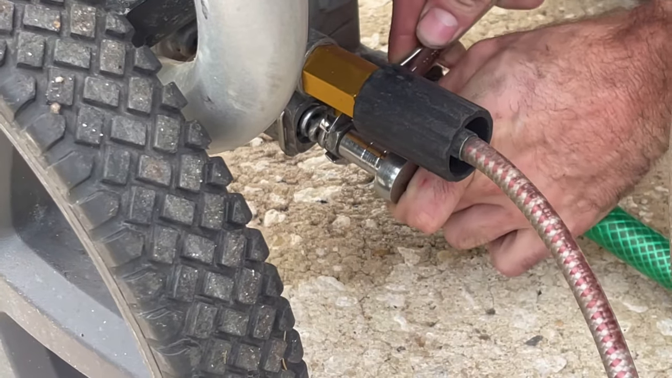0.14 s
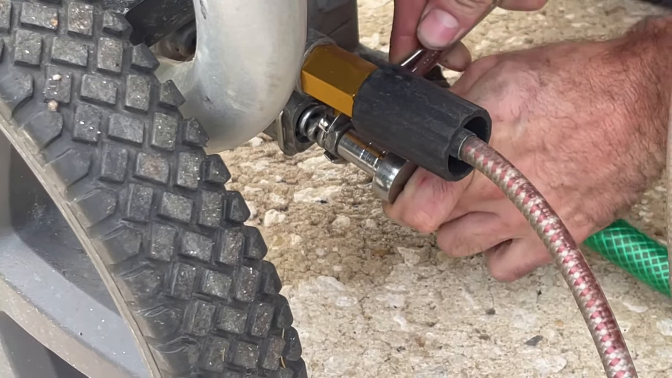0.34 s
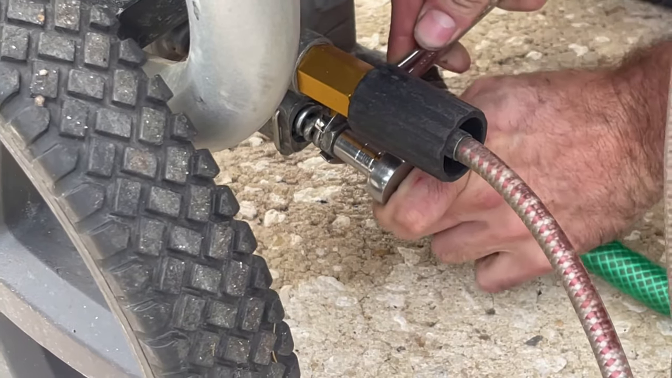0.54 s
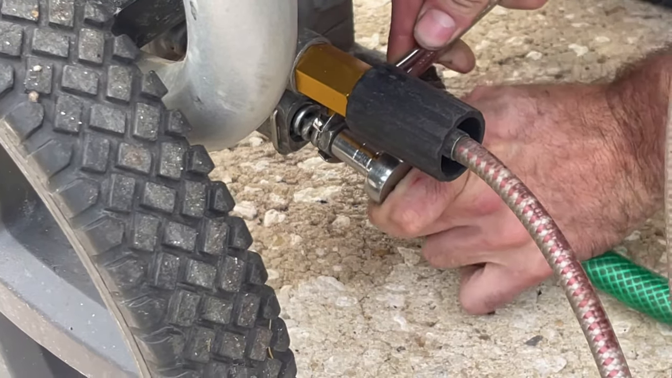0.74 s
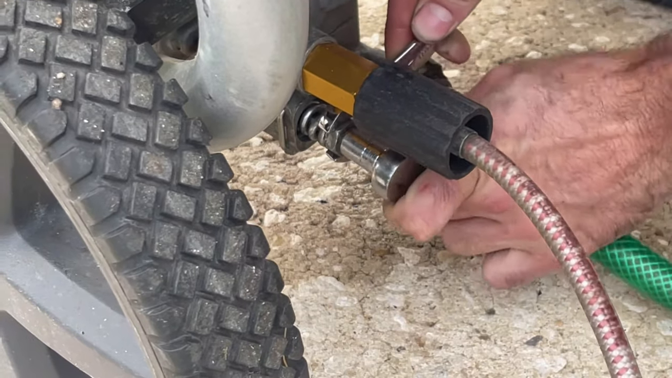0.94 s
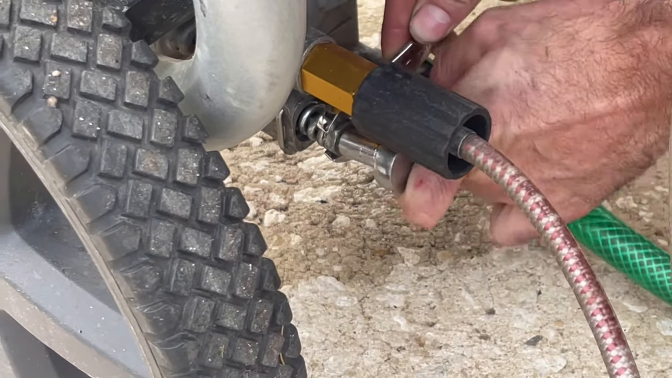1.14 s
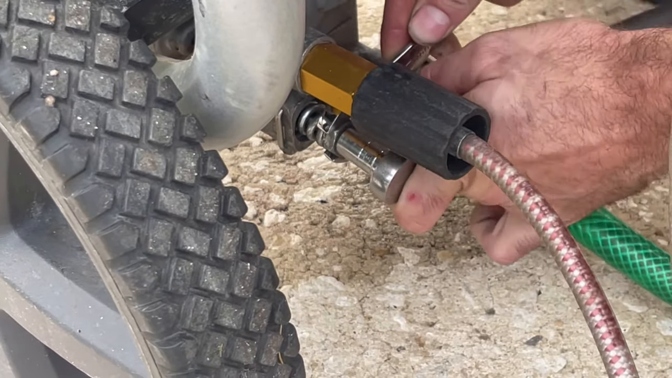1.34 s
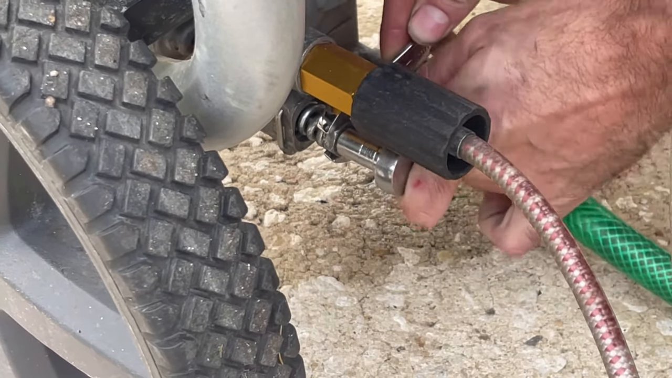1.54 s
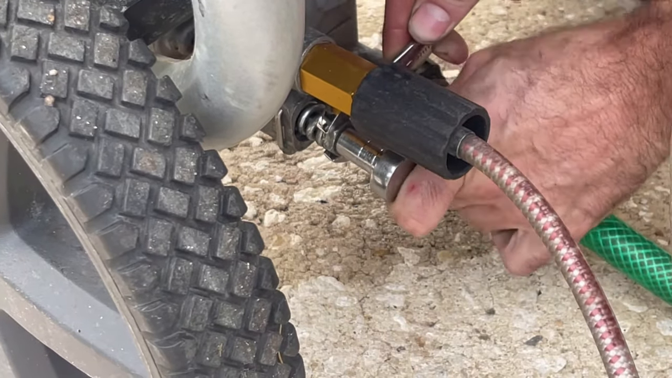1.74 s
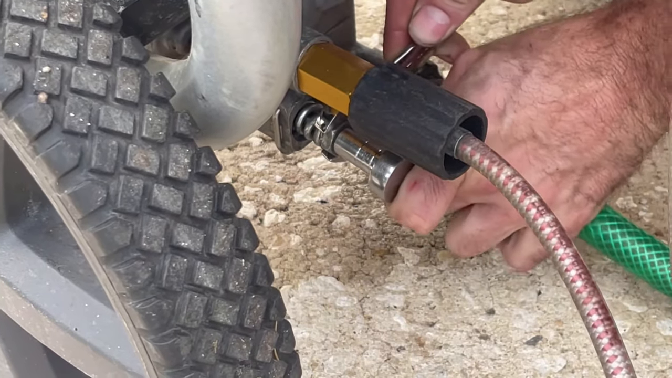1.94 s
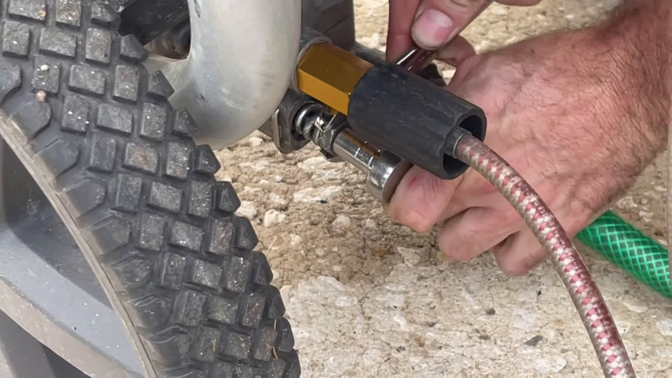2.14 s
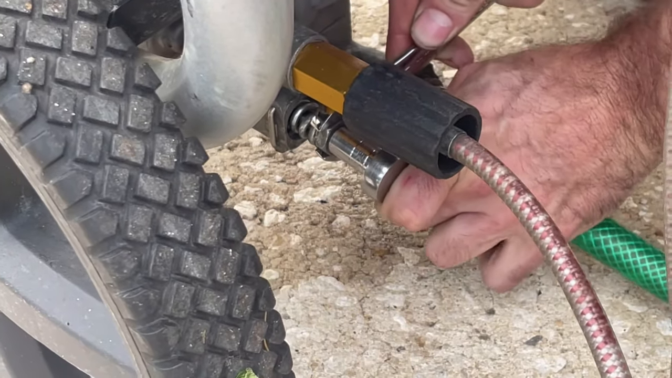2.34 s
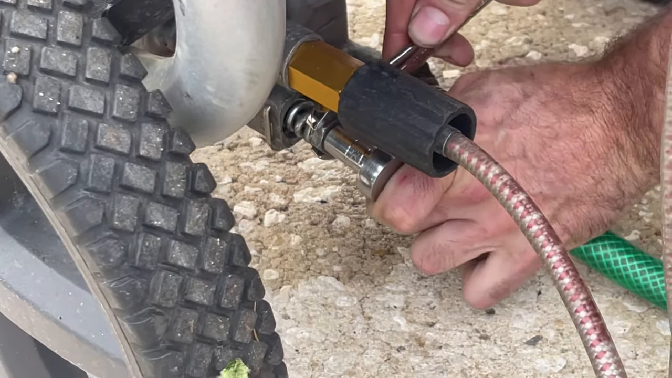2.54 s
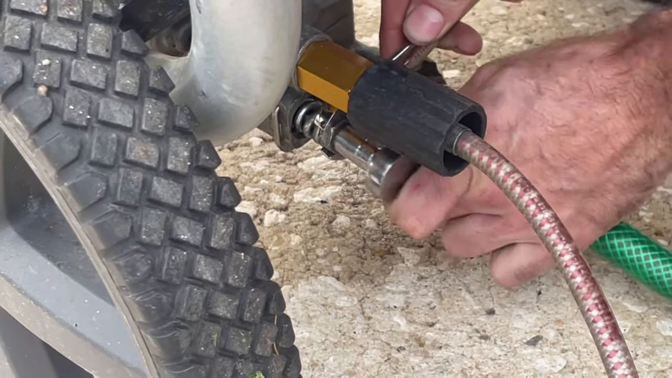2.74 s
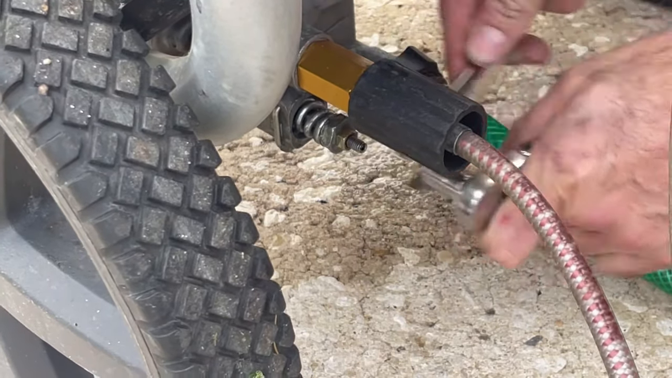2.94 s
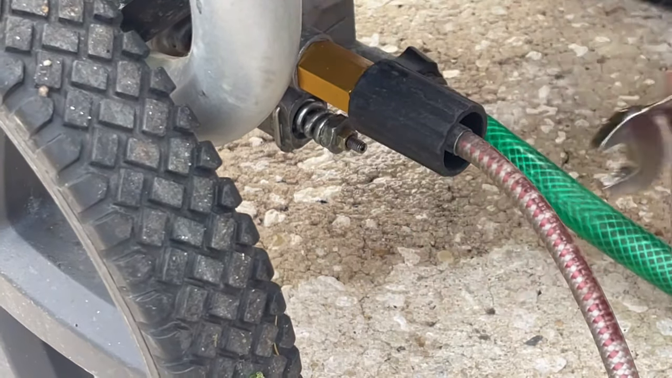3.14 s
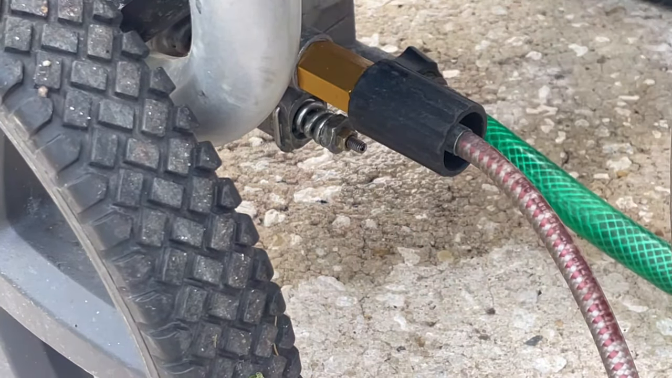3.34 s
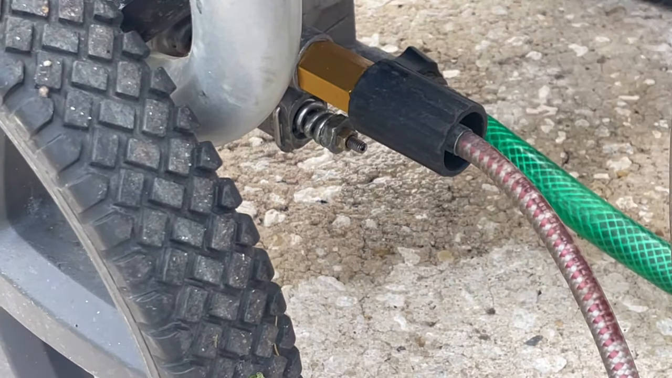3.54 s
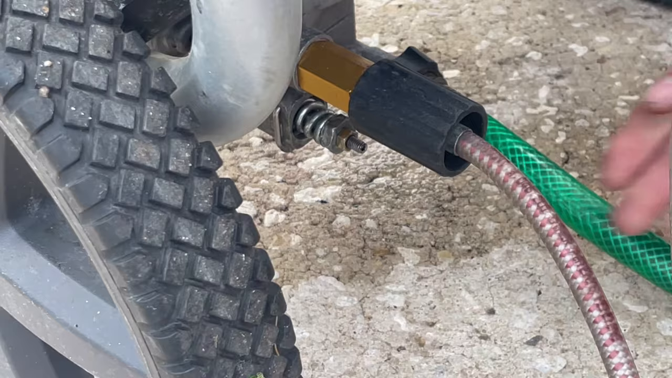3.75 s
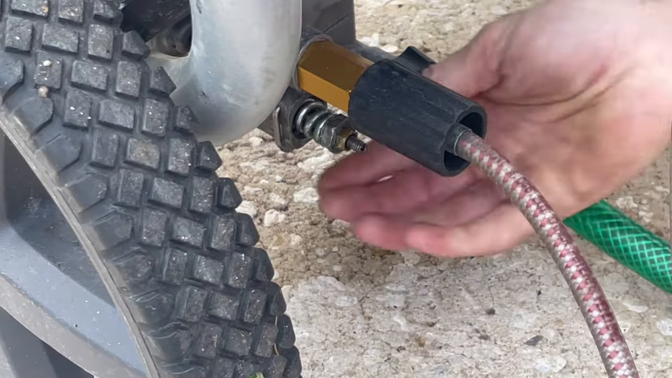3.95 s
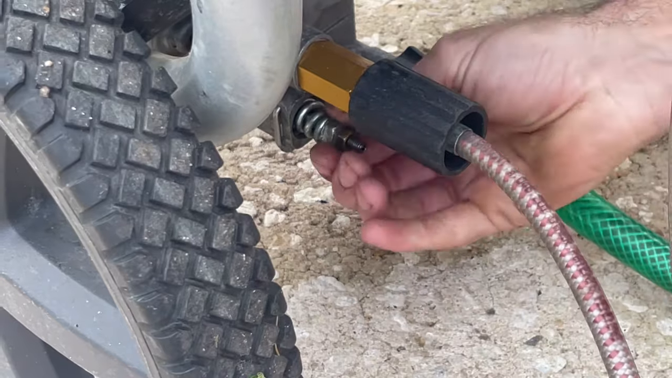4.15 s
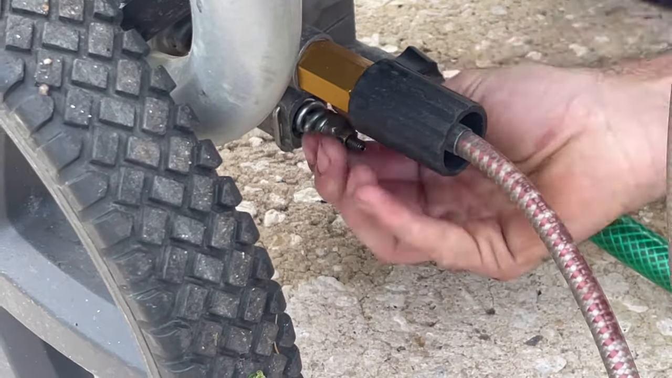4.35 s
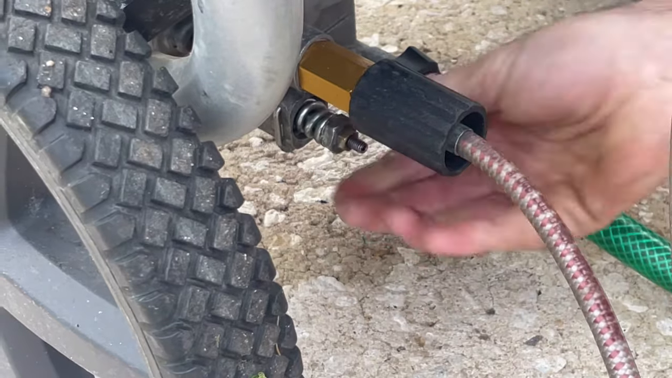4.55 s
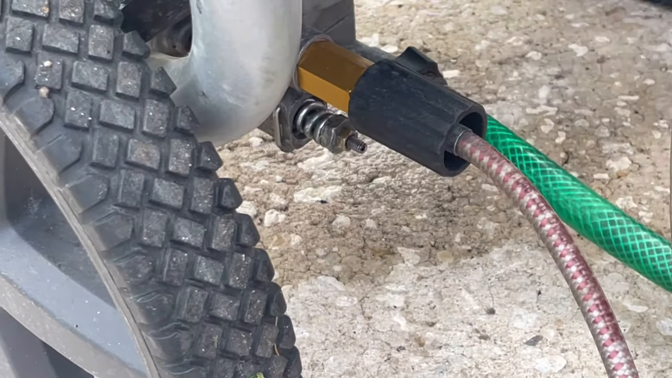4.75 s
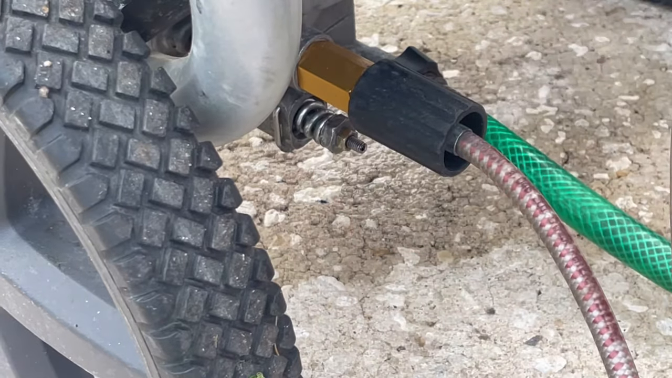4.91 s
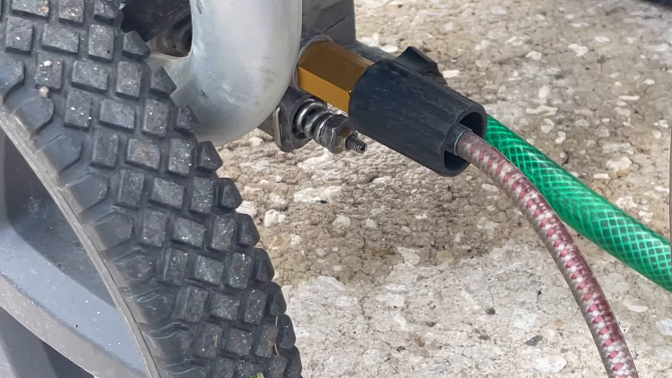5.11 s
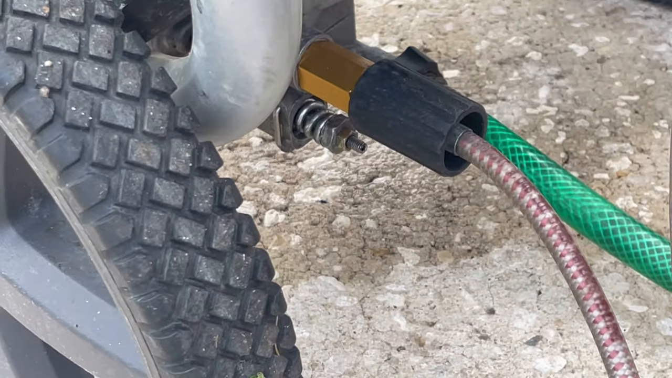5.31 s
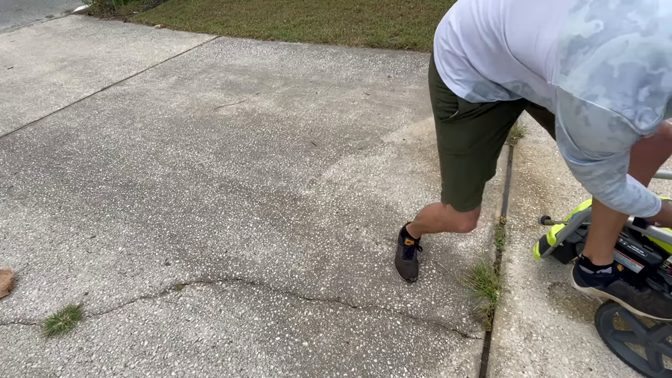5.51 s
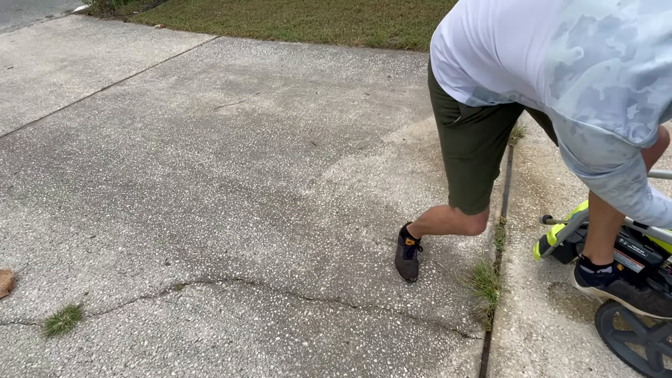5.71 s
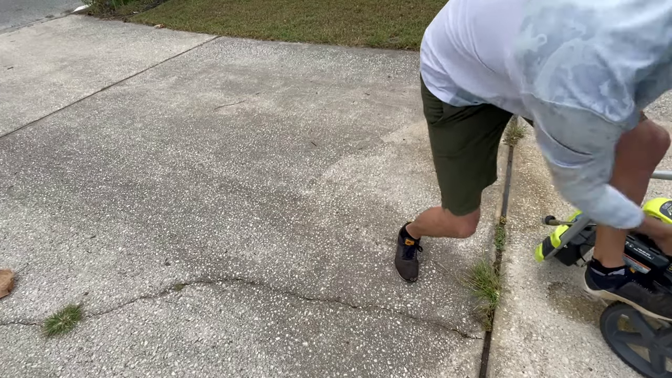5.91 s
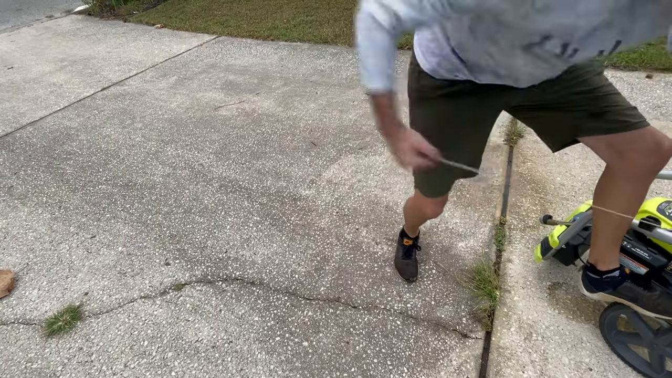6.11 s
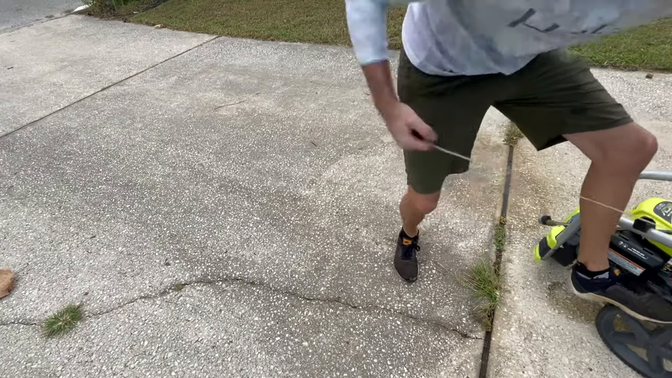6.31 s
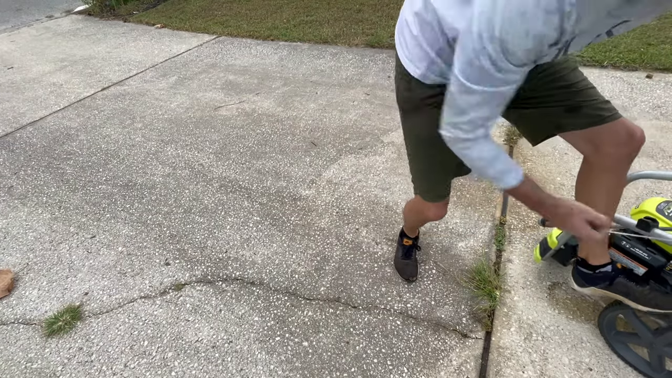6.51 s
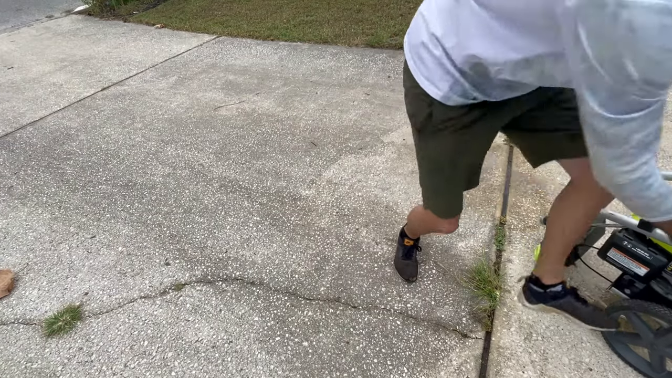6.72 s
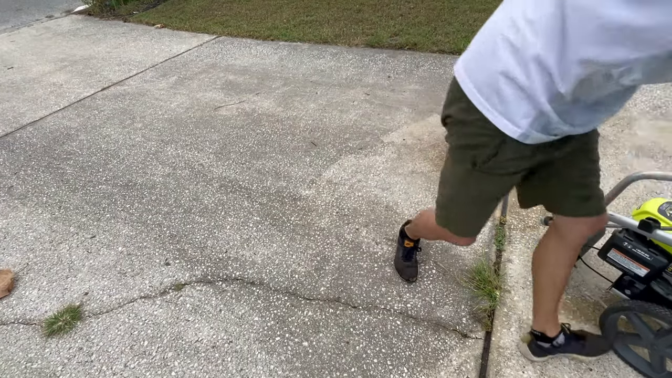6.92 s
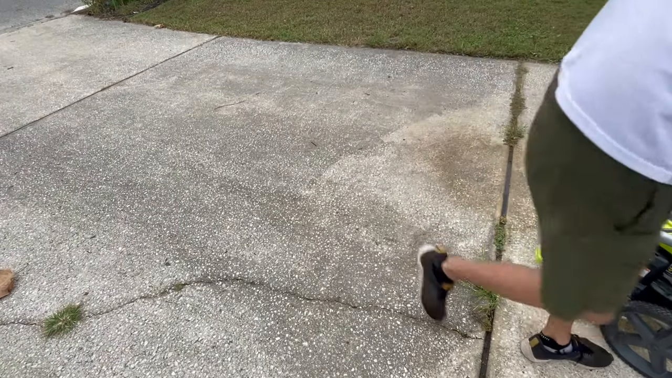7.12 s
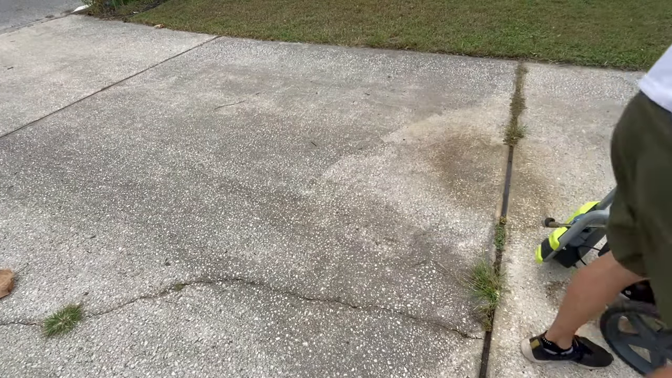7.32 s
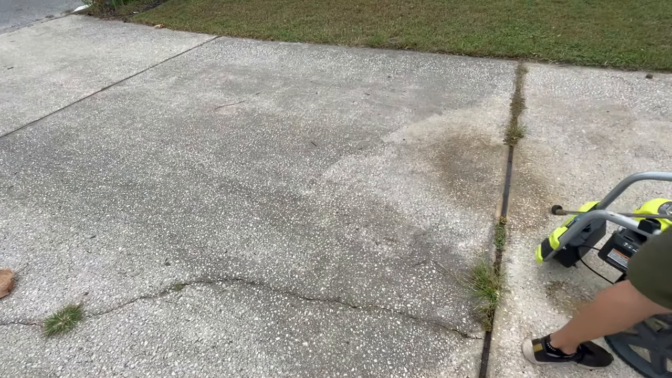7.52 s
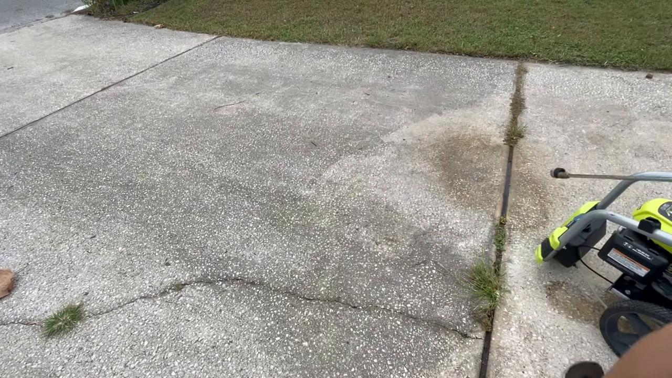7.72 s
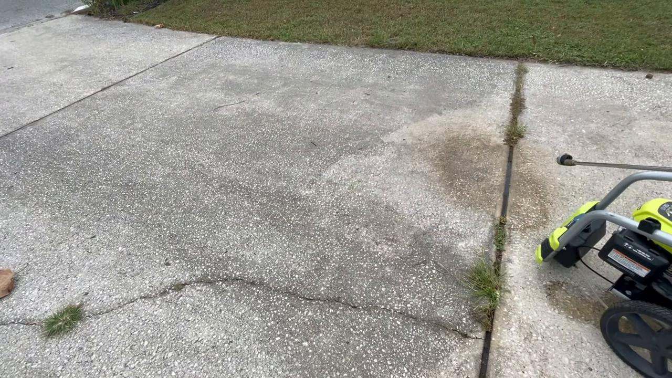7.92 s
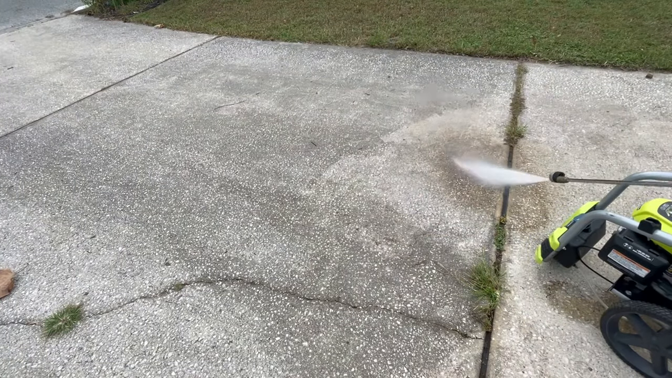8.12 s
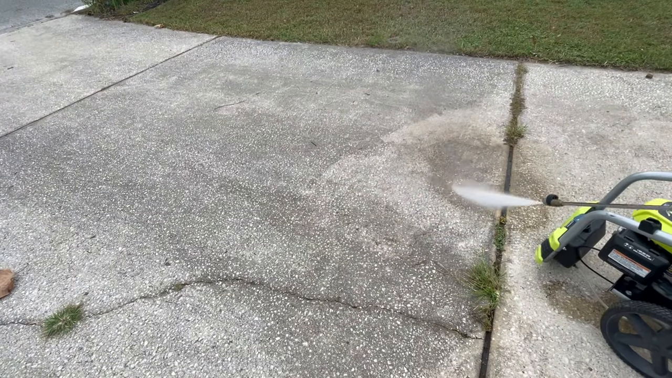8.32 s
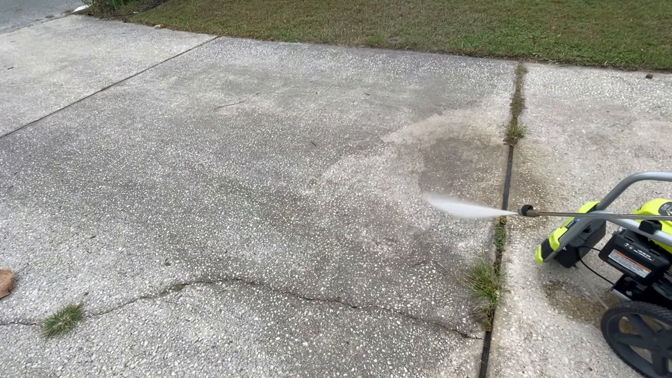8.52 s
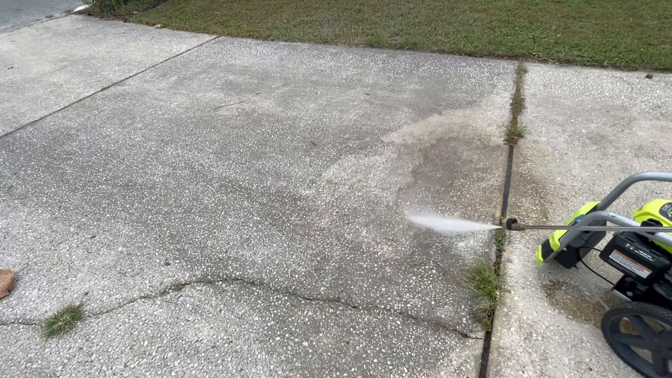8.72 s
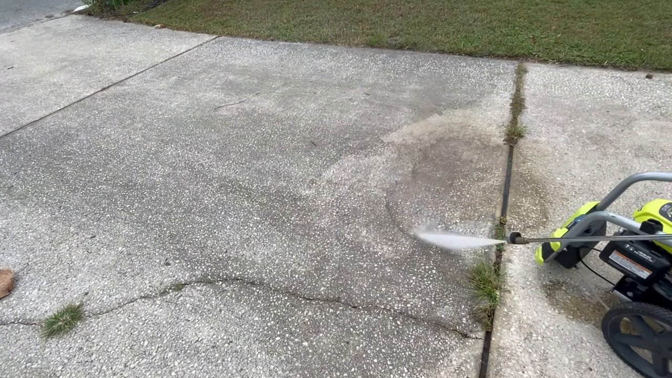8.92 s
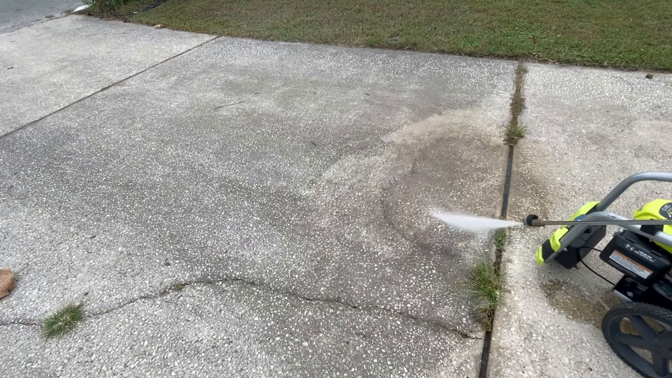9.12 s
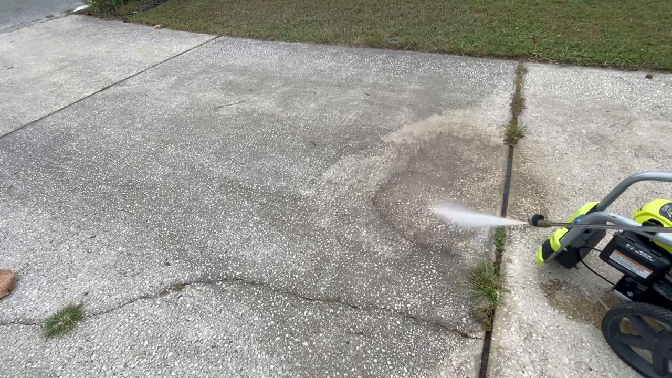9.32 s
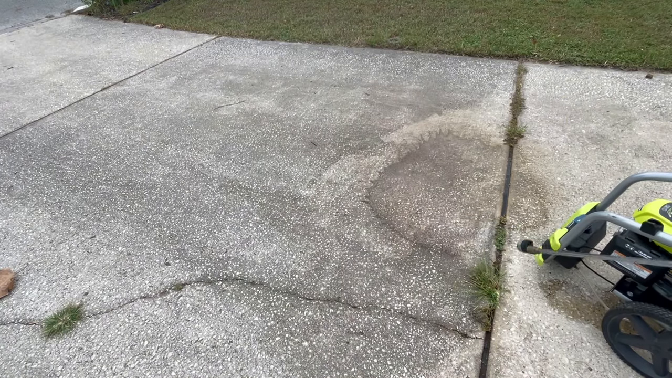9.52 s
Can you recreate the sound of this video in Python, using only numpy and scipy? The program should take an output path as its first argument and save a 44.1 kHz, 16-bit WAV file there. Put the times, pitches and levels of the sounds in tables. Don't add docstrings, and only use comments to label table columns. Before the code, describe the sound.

Steel wrench clinks and dull knocks close up over faint traffic, then a cord-started petrol engine roars to life and a water jet hisses.

```python
import sys
import numpy as np
from scipy import signal
from scipy.fft import rfft, irfft, next_fast_len
from scipy.io import wavfile
from scipy.ndimage import uniform_filter1d

SR = 44100
rng = np.random.default_rng(int(sys.argv[2]) if len(sys.argv) > 2 else 0)


def generate_wav(sig):
    pcm = np.round(np.clip(np.atleast_2d(sig).T, -1, 1) * 32767).astype(np.int16)
    wavfile.write(sys.argv[1], SR, pcm)


def voltage_ratio(decibels):
    exponent = np.asarray(decibels, float) / 20
    return 10 ** exponent


N = 421596
TIME, SIZE = np.arange(N) / SR, next_fast_len(N + 2048)
HZ = np.arange(SIZE // 2 + 1) * SR / SIZE + 1e-3
CUT_S = 5.36
EFFORT_MID_DB, SPEED_MID = -20, 26
RASP_EDGE_S = 0.032

# time [s], level [dB].
EFFORT = [(6.05, -45), (6.1, -35.5), (6.31, -19.5), (6.4, -14), (6.5, -16), (6.7, -19.5), (6.96, -21.5),
          (7.3, -22.5), (8.04, -21.5), (8.3, -21), (8.55, -19.5), (8.89, -18.5), (9.25, -21), (9.56, -23)]
# time [s], level [dB].
SPRAY = [
    (8.1, -31),
    (8.234, -37),
    (8.672, -34),
    (8.948, -31),
    (9.176, -36),
    (9.56, -34),
]
# frequency [Hz], level [dB per Hz].
CRACK = [(120, -65.5), (400, -38.5), (1200, -10), (3000, 0), (6000, 0), (8500, -8.5), (11000, -1),
         (13500, -14.5), (15800, -46.5)]
# frequency [Hz], level [dB per Hz].
RUSTLE = [(880, -27.5), (1500, -19.5), (2530, 0.5), (3050, -1.5), (4510, 0), (7980, -9), (11300, -7.5),
          (15700, -28.5)]


def rms_one(x):
    return x / np.sqrt(np.mean(x ** 2) + 1e-20)


def in_time(rows):
    s, *columns = np.transpose(rows)
    return [np.interp(TIME, s, c) for c in columns]


def between(rows, fade_s=.004):
    return np.clip(np.minimum(TIME - rows[0][0], rows[-1][0] + fade_s - TIME) / fade_s, 0, 1)


def bout(start_s, length_s, fade_s):
    return between([(start_s,), (start_s + length_s,)], fade_s)


def at_hz(points):
    hz, value = np.transpose(points)
    return np.interp(np.log(HZ), np.log(hz), value)


def noise(spectrum):
    return rms_one(irfft(rfft(rng.standard_normal(SIZE)) * voltage_ratio(at_hz(spectrum)), SIZE)[:N])


def drift(rate):
    knots = rng.standard_normal(int(N / SR * rate) + 2)
    return np.interp(TIME * rate, np.arange(len(knots)), knots)


def ring(x, hz, t60):
    r, w = voltage_ratio(-60 / (t60 * SR)), 2 * np.pi * hz / SR
    return signal.lfilter([0, np.sin(w)], [1, -2 * r * np.cos(w), r * r], x + 1e-18)


def die_away(x, t60):
    return signal.lfilter([1], [1, -voltage_ratio(-60 / (t60 * SR))], x)


def resonance(x, hz, width_hz):
    r = np.exp(-np.pi * width_hz / SR)
    poles = [1, -2 * r * np.cos(2 * np.pi * hz / SR), r * r]
    return signal.lfilter([(1 - r * r) / 2, 0, (r * r - 1) / 2], poles, x)


def narrow_noise(hz, width_hz):
    return resonance(resonance(rng.standard_normal(N), hz, width_hz), hz, width_hz)


def add(out, s, sound):
    part = out[round(s * SR):][:len(sound)]
    part += sound[:len(part)]


def contact_at(cycles, share, lead_s):
    passes = np.diff(np.floor(cycles - share), prepend=0.) > 0
    return np.roll(passes, -round(lead_s * SR)) * 1.


def exhaust(cycles, speed, exhaust_db, load, strength):
    # frequency [Hz], width [Hz], level [dB].
    chambers = [(66.7, 10.7, 4), (113.6, 64, 3.5), (142.7, 115, 2), (273.6, 54, -2)]
    suck_share, suck_width, suck_db = 0.1786, 0.013, 1.5
    idle_turn = 0.28 * (1 - load) * contact_at(cycles, 0.485, 0.00805)
    pushes = (contact_at(cycles, 0, 0.00909) + idle_turn) * strength
    puff = signal.lfilter(*signal.butter(2, [38, 210], "band", fs=SR), pushes)
    boom = sum((-1) ** k * voltage_ratio(db) * resonance(puff, hz, w) for k, (hz, w, db) in enumerate(chambers))
    boom = voltage_ratio(exhaust_db + 1.0) * boom / np.sqrt(uniform_filter1d(boom ** 2, size=9000) + 1e-12)
    suck = np.exp(-.5 * ((cycles % 1 - suck_share) / suck_width) ** 2)
    return boom - voltage_ratio(exhaust_db + suck_db) * suck * strength * np.clip(speed / SPEED_MID, 0, 1)


def engine_shell(cycles, shell_db, load, blow_strength, seat_strength):
    # frequency [Hz], level [dB], t60 [s].
    casing = [(520, 7, 0.028), (632, 11, 0.069), (730, -17, 0.0071), (1250, -3.5, 0.14)]
    seating, seat_loaded, rebound = 0.63, 0.98, 0.29
    blows = (contact_at(cycles, 0, 0.006724) + rebound * contact_at(cycles, 0, 0.0046)) * blow_strength
    seat_level = seating * (1 - (1 - seat_loaded) * load)
    blows -= seat_level * contact_at(cycles, 0, -0.00438) * seat_strength
    shell = sum(voltage_ratio(db) * ring(blows, hz, t60) for hz, db, t60 in casing)
    running = TIME > 6.6
    return voltage_ratio(shell_db + 0.6) * shell / np.sqrt(np.mean(shell[running] ** 2))


def pump(cycles, exhaust_db, choke, load):
    multiples = [2, 6, 12, 13, 16, 18, 19, 23, 25, 28, 30, 9, 10, 11, 17, 20, 21, 22, 26, 27]
    # level [dB against the exhaust] on choke, in bypass, while spraying.
    order_levels = [(-4, -9, -15), (-8.5, -15, -4), (-39, -40, -12), (-20, -21, -12.5), (-6, -22, -10),
                    (-4, -13.5, -2), (-12, -8, -4), (-2.5, -13.5, -15), (-1, -15, -39), (-12, -13, -19.5),
                    (-29, -10, -27), (-14, -47, -21), (-43, -25, -20), (-13, -13, -18.5), (-38.5, -54, -19),
                    (-30, -29, -18), (-9, -14, -13), (-41, -25, -11), (-28, -23, -31), (-20, -21, -22.5)]
    cam_lead, sixth_lead = 0.034, 0.079
    wobble = cycles + cam_lead + 0.0079 * drift(21)
    hum = np.zeros(N)
    for k, (choke_db, db, loaded_db) in zip(multiples, order_levels):
        level_db = db + choke * (choke_db - db) + load * (loaded_db - db) + 2.0 * drift(4.3)
        turn = wobble + (k == 6) * (sixth_lead - cam_lead)
        hum += voltage_ratio(level_db) * np.sin(2 * np.pi * k * turn)
    return hum * voltage_ratio(exhaust_db) * np.clip((TIME - 6.35) / 0.29, 0, 1)


def valve_tick(cycles, load, blow_strength, seat_strength):
    # frequency [Hz], width [Hz], level [dB].
    cover_bands = [(4380, 130, 8.6), (5760, 190, 1.2), (7240, 490, 3.5), (3130, 400, 2)]
    rattles_per_s, rattle_db, rattle_t60_s = 80, -19, 0.02
    gate = die_away(contact_at(cycles, 0, 0.0066) * seat_strength ** 2, 0.04)
    gate = uniform_filter1d(gate, size=70)
    cover = voltage_ratio(3 * rng.standard_normal((int(cycles[-1]) + 2, len(cover_bands))))
    cover = cover[(cycles + .5).astype(int)].T
    white = rng.standard_normal(N)
    colour = voltage_ratio(4.0) * noise(CRACK)
    for (hz, width_hz, db), uneven in zip(cover_bands, cover):
        colour += voltage_ratio(db) * uneven * resonance(white, hz, width_hz)
    tick = gate * colour
    struck = contact_at(cycles, 0, .0052) * blow_strength ** 3
    tick += voltage_ratio(2.5 + 5.3 * load) * ring(struck, 4710, .018)
    hits = rng.random(N) < rattles_per_s / SR
    loose = hits * voltage_ratio(rattle_db + 2.4 * np.minimum(rng.exponential(1, N), 4))
    return tick + die_away(loose + 1e-18, rattle_t60_s) * noise(CRACK)


def clatter(cycles, clatter_db):
    # frequency [Hz], level [dB per Hz].
    clatter_colour = [(150, -7), (300, -12), (600, -2), (900, -8),
                      (1300, -5), (2000, -11.5), (3000, -16.5), (4600, -15), (7000, -21), (9000, -25.5),
                   (11000, -23.5), (13500, -29.5), (15700, -40.5)]
    throb = 1 + 0.048 * np.cos(2 * np.pi * (cycles - .05)) + 0.038 * np.cos(12 * np.pi * cycles)
    return voltage_ratio(clatter_db + 2.0 + 1.0 * drift(46)) * throb * noise(clatter_colour)


def engine():
    # time [s], firings per s.
    crank_speed = [(6.0, 7.81), (6.159, 7.57), (6.256, 10.63), (6.466, 22.52), (6.592, 26.44),
                   (6.708, 26.9), (7.061, 25.96), (7.369, 24.28), (7.699, 23.28), (8.029, 21.59),
                   (8.208, 21.84), (8.46, 27.53), (8.591, 29.57), (8.692, 30.35), (9.047, 31.11),
                   (9.56, 30.43)]
    # level at middle effort [dB], share of the effort's swing, rise [dB per octave of speed],
    # extra on choke [dB], extra while spraying [dB].
    layer_levels = [
        (-26.5, 0.74, 3.5, 3, -7),
        (-28, 0.95, 6.5, 1.4, 0),
        (-27.5, 1, -4.5, 1.5, 0.5),
    ]
    choke_off_s, choke_fade_s, load_rise_s = 7.25, .2, 0.98
    (exhaust_db,), (speed,) = in_time(EFFORT), in_time(crank_speed)
    choke = np.clip((choke_off_s - TIME) / choke_fade_s, 0, 1)
    load = np.clip((TIME - SPRAY[0][0]) / load_rise_s, 0, 1)
    swing_db, octaves = exhaust_db - EFFORT_MID_DB, np.log2(speed / SPEED_MID)
    shell_db, clatter_db, tick_db = [
        db + share * swing_db + octave_db * octaves + choke_db * choke + load_db * load
        for db, share, octave_db, choke_db, load_db in layer_levels]
    cycles = np.cumsum(speed * (TIME >= crank_speed[0][0])) / SR
    strength = voltage_ratio(0.34 * rng.standard_normal((int(cycles[-1]) + 2, 3)))
    puff_strength, blow_strength, seat_strength = strength[(cycles + .4).astype(int)].T
    out = exhaust(cycles, speed, exhaust_db, load, puff_strength)
    out += engine_shell(cycles, shell_db, load, blow_strength, seat_strength)
    out += pump(cycles, exhaust_db, choke, load)
    out += clatter(cycles, clatter_db)
    out += voltage_ratio(tick_db) * valve_tick(cycles, load, blow_strength, seat_strength)
    return between(EFFORT, 0.018) * out


def chuffs():
    # time [s], level [dB].
    escapes = [
        (6.121, -6),
        (6.238, -5),
    ]
    clicks = np.zeros(N)
    for s, db in escapes:
        clicks[round(s * SR)] = voltage_ratio(db)
    return ring(uniform_filter1d(clicks, size=90), 106, 0.079)


def spray():
    # frequency [Hz], level [dB per Hz].
    jet_colour = [(1000, 0), (3000, 9.5), (6000, -2), (8500, -1.5), (11000, 9), (13500, -2), (15500, -42)]
    spray_db, = in_time(SPRAY)
    return between(SPRAY, 0.024) * voltage_ratio(spray_db + 2.5 + 1.3 * drift(9.5)) * noise(jet_colour)


def wrench():
    # start [s], peak [dB], bending modes [dB], jaw mode [dB], time until the grip stops them [s].
    clinks = [(2.8336, -32, -42, -41, 0.086), (3.3194, -30, -49, -47, 0.038),
              (3.3395, -10, -36, -52.5, 0.31), (3.3815, -1, -31, -24, 0.18),
              (3.5604, -19.5, -37, -49, 0.021), (3.6009, -1, -28.5, -40, 0.023),
              (3.6235, -16, -33, -58, 0.06), (3.7992, -16, -50, -17, 0.083),
              (3.9066, -27, -48.5, -50, 0.078), (3.9423, -39.5, -43, -39, 0.025),
              (4.3952, -38, -55, -51, 0.1), (4.7569, -37, -56, -39, 0.091), (4.789, -48.5, -53, -41, 0.11),
              (4.817, -16.5, -53.5, -31, 0.079), (4.9507, -28.5, -66, -38, 0.073),
              (5.078, -42, -67, -53, 0.58), (5.123, -20, -33, -23.5, 0.86), (5.1572, -31, -40.5, -29, 1.2),
              (5.1703, -15, -42, -35, 0.21), (5.2105, -1, -51.5, -44, 1.8),
              (5.214, -15.5, -50, -5.5, 0.031), (5.268, -46, -47, -33.5, 3.4), (3.392, -27, -42, -12, 0.09),
              (5.212, -39.5, -45.5, -48, 0.16)]
    # ring mode [dB], the other upper modes [dB].
    upper_shifts = [(0, 0), (-5, -4), (-13, -12), (4, 13), (23, -2.5), (-1, -1), (11.5, 9), (-13, 8.5),
                    (4, -4.5), (2, 2), (-1, -4.5), (26, 25), (42, 11), (6, 8), (28.5, 10), (22.5, 22.5),
                    (16, 1), (-3, -3), (-10, -1), (5.5, 7), (-3, 3), (-2, 1), (50, 35.5), (-5, 0)]
    # low pair [dB], upper bending mode [dB], shank modes [dB], its side modes [dB].
    lower_shifts = [(-9, 0, -0.5, 0), (-7.5, -3.5, -3, -4), (10.5, 0, 0, -9), (-4, -7.5, -1, 2.5),
                    (-4, 1, -6, 0), (-6, 13, -11, 7), (-18, -13, 3, -1.5), (-5.5, 12, 2, -6),
                    (-1, 7, -6.5, -1), (-13, -5, 2, 0), (0, -4, -0.5, 1.5), (-2, 0, -3, -1),
                    (10, -5, -5, 0), (6, 0, 0, 1.5), (0, 0, 1, -2), (0, -8, -3, 0.5), (-2, -8, -1.5, -2),
                    (4, 7.5, -3.5, 2), (0, 8, -4, 4), (2, 4, 4, -6), (0.5, 0, 0.5, -2), (-12, -13, 0, 0),
                    (-8.5, -7, -0.5, 2), (-20, 13, -1.5, 0)]
    # start [s], peak [dB].
    touches = [
        (1.2045, -30),
        (1.228, -31),
        (1.266, -32),
        (2.361, -43),
        (3.27, -36.5),
        (3.2934, -44.5),
        (3.491, -21.5),
    ]
    mode_hz = [1235, 1635, 2560, 3583, 4446, 6815, 6901, 7050, 8576, 9905, 11190, 12380, 13370, 15460]
    # level in its group [dB], free t60 [s].
    steel_modes = [(-15, 0.34), (-14.5, 0.24), (0, 1.3), (-5, 3), (-3, 0.45), (-3, 0.73), (-4, 1.2),
                   (-5, 0.79), (-26.5, 0.85), (-2, 1.7), (-6.5, 0.31), (-11.5, 3), (-16.5, 1), (-32, 1.4)]
    touch_bend_db, touch_jaw_db, touch_shank_db, touch_grip_s = -43, -31, -7, 0.016
    shank_slope, shank_db = 0.96, -14
    loose_db = 3.5
    unheld_t60_s, unheld_db = 0.41, 0.5
    slide_db, slide_step_s, swell_s = 3.5, .024, .002

    out, cracks, unheld, t = np.zeros(N), np.zeros(N), np.zeros(N), TIME[:SR // 3]
    hz, (mode_db, free_t60) = np.array(mode_hz)[:, None], np.transpose(steel_modes)
    group = np.digitize(mode_hz, [4000, 5500, 8000])
    blows = [(*clink, upper, lower) for clink, upper, lower in zip(clinks, upper_shifts, lower_shifts)]
    for s, db in touches:
        blows.append((s, db, db + touch_bend_db, db + touch_jaw_db, touch_grip_s,
                      (0, 0), (0, 0, touch_shank_db, 0)))
    free = np.sin(2 * np.pi * hz * t) * voltage_ratio(5.5 - 60 * t / free_t60[:, None]) * (1 - np.exp(-t / swell_s))
    for s, peak_db, bending_db, jaw_db, grip_s, upper, lower in sorted(blows):
        (ring_db, upper_db), (low_db, bend_db, shank_shift_db, side_db) = upper, lower
        group_db = [bending_db, jaw_db, shank_slope * peak_db + shank_db, 1.65 * peak_db - 24.0 + upper_db]
        level_db = np.array(group_db)[group] + mode_db
        level_db[[0, 1]] += low_db
        level_db[3] += bend_db + loose_db * np.log2(np.clip(grip_s, .03, .9) * 10)
        level_db[5] += shank_shift_db
        level_db[[6, 7]] += shank_shift_db + side_db
        level_db[9] += ring_db - upper_db
        chance = rng.standard_normal((len(hz), 16))
        steps_s = np.arange(16) * slide_step_s
        shifting_db = np.array([np.interp(t, steps_s, slide_db * row) for row in chance])
        grip = voltage_ratio(-60 * (t / np.clip(grip_s, .03, 3)) ** 1.004)
        out[round(s * SR):] *= np.clip(1 - 2 * voltage_ratio(peak_db), .1, 1)
        add(out, s, grip * np.sum(free * voltage_ratio(level_db[:, None] + shifting_db), axis=0))
        escaped = voltage_ratio(level_db[8] + unheld_db - 60 * t / unheld_t60_s)
        add(unheld, s, escaped * np.sin(2 * np.pi * hz[8] * t))
        add(cracks, s, voltage_ratio(peak_db - 18.0) * (voltage_ratio(-60 * t / 0.0086) + voltage_ratio(-10.5 - 60 * t / 0.1)))
    return out + unheld + cracks * noise(CRACK)


def struck_body(events, modes, ring_db):
    contact, hard, bright, t = np.zeros(N), np.zeros(N), np.zeros(N), TIME[:9000]
    for s, peak_db, bright_db, t60 in events:
        fade = voltage_ratio(peak_db - 60 * t / np.clip(t60, .01, .3))
        rub = fade + voltage_ratio(peak_db - 11.5 - 60 * t / 0.26)
        add(contact, s, rub)
        add(hard, s, voltage_ratio(0.66 * bright_db + 6.0) * rub)
        add(bright, s, voltage_ratio(bright_db) * fade)
    white = rng.standard_normal(N)
    body = np.zeros(N)
    for hz, db, t60 in modes:
        drive = hard if hz > 1600 else contact
        body += voltage_ratio(db + 1.0 * drift(25)) * ring(white * drive, hz, t60)
    return voltage_ratio(ring_db) * body + voltage_ratio(2.0) * bright * noise(CRACK)


def starter_clacks():
    # start [s], peak [dB], brightness [dB].
    clack_events = [(5.401, -28, -12), (5.419, -25.5, -14), (5.471, -10, -57), (5.517, -20.5, -19),
                    (5.591, -26, -16), (5.626, -31, -20), (5.778, -46, -12), (5.808, -27.5, -15.5),
                    (5.981, -9, -7), (6.011, -12, -21), (6.113, -26.5, -6), (6.181, -31, -8),
                    (6.2, -28, -5), (6.218, -9.5, -8.5), (6.287, -28, 2), (8.11, -7, -12)]
    # frequency [Hz], level [dB], t60 [s].
    housing_modes = [(575, -12, 0.013), (870, 0.5, 0.0058), (1230, 2, 0.0049), (1780, 3, 0.0033),
                     (3830, 10, 0.0016), (4500, -9, 0.0078)]
    return struck_body([(*clack, .045) for clack in clack_events], housing_modes, ring_db=-29.0)


def tool_knocks():
    # start [s], peak [dB], brightness [dB], t60 [s].
    knock_events = [(0.06, -56, -12, 0.05), (0.112, -38, -13.5, 0.049), (0.293, -47, -17, 0.046),
                    (0.381, -63.5, -10.5, 0.05), (0.555, -67, 4, .03), (0.6, -67, 4, .03),
                    (0.67, -67, 3, .04), (0.751, -46.5, -12, 0.032), (0.9, -65, 2, .03),
                    (0.94, -69, 2, 0.089), (1.028, -25, -8, 0.042), (1.096, -30, -61, 0.033),
                    (1.562, -60, -6, 0.06), (1.616, -50, -21, 0.06), (1.865, -74, 1, .03),
                    (2.57, -71, 7, .04), (2.674, -67, 6, 0.057), (2.865, -64, 4, .02),
                    (3.75, -55, -1, 0.037), (2.835, -35, -6.5, 0.088), (2.885, -30.5, -44, 0.033),
                    (2.971, -37.5, -20, 0.054), (2.986, -49, -5, 0.025), (2.826, -50, 2, 0.017),
                    (3.002, -38.5, -7, 0.053), (3.339, -39.5, 11, 0.014), (3.3815, -48, 19, 0.017),
                    (3.39, -48, 16, 0.16), (3.61, -56, 6, 0.08), (1.29, -42, -60, 0.21),
                    (1.045, -35, -43, .13), (2.9, -58, -27, 0.14), (3.6, -42, 5, 0.02),
                    (4.219, -37, -7, 0.045), (4.536, -43.5, -14, 0.054), (4.57, -33.5, -5.5, 0.043),
                    (4.679, -25, -11, 0.038), (4.885, -55, 5.5, 0.017), (4.94, -48, -3, 0.028),
                    (5.123, -24.5, -19, 0.075), (5.154, -17.5, -8.5, 0.014), (5.221, -38, -11, .02),
                    (5.238, -48, -13, .025), (5.265, -51, -8, .03), (5.297, -44, -1, .02),
                    (5.314, -37, -8, 0.045), (5.345, -38, -20, .03)]
    # frequency [Hz], level [dB], t60 [s].
    frame_modes = [(354, -15.5, 0.025), (562, -2.5, 0.02), (840, 1.5, 0.0044), (1234, 2, 0.017),
                   (1500, -8.5, 0.024), (2073, 7, 0.01), (2900, 1, 0.012), (4340, -11.5, 0.014),
                   (5620, -7.5, 0.01)]
    return struck_body(knock_events, frame_modes, ring_db=-33.0)


def squeal(rows, waver_rate):
    hz, squeal_db = in_time(rows)
    tone = np.sin(2 * np.pi * np.cumsum(hz) / SR)
    return between(rows) * voltage_ratio(squeal_db + 3.0 * drift(waver_rate)) * tone


def pulley_squeak():
    # time [s], frequency [Hz], level [dB].
    pulley = [
        (6.1, 3910, -52),
        (6.125, 4330, -49),
        (6.15, 4540, -40),
        (6.165, 4680, -34),
        (6.185, 4780, -46),
    ]
    return squeal(pulley, 54)


def jaw_squeals():
    # time [s], frequency [Hz], level [dB].
    off_nut = [
        (3.42, 4480, -48),
        (3.45, 4780, -49),
        (3.48, 4600, -54),
        (3.51, 4500, -62),
    ]
    drawn_back = [
        (3.0, 3600, -62),
        (3.06, 3450, -73),
        (3.17, 3350, -77),
    ]
    return squeal(off_nut, 60) + squeal(drawn_back, 60)


def frame_tube():
    # start [s], level [dB].
    tube_hits = [
        (1.098, -53.5),
        (2.87, -52.5),
    ]
    t = TIME[:SR // 2]
    out = np.zeros(N)
    for s, db in tube_hits:
        add(out, s, voltage_ratio(db - 60 * t / 1.0) * np.sin(2 * np.pi * 600 * t))
    return out


def handling():
    # start [s], length [s], level [dB].
    rustle_bouts = [
        (3.173, 0.2, -63),
        (4.515, .07, -64.5),
        (4.85, .2, -68),
    ]
    level = sum(bout(s, length, 0.041) * voltage_ratio(db) for s, length, db in rustle_bouts)
    return voltage_ratio(4.0 * drift(30)) * noise(RUSTLE) * level


def scatter():
    # frequency [Hz], level [dB per Hz].
    wall_colour = [(150, -22), (500, -6), (1000, -3), (2200, 4), (4500, -1), (9000, -7), (15000, -30)]
    level = between(EFFORT, 0.22) * voltage_ratio(in_time(EFFORT)[0] - 10)
    return level * noise(wall_colour) * [[1], [-1]]


def driveway():
    # time [s], rustle level [dB].
    hand_rustle = [
        (5.36, -51.5),
        (5.52, -53),
        (5.58, -88),
        (5.832, -61.5),
        (5.97, -58),
        (6.032, -40),
        (6.15, -43),
        (6.32, -31),
    ]
    # frequency [Hz], level [dB].
    motor_hum = [(78.5, -39), (156.1, -38), (235, -43), (312.2, -53), (390, -57.5)]
    # frequency [Hz], level [dB per Hz].
    street_colour = [(30, -3), (80, -7), (160, -1), (260, -7.5), (400, -15.5), (700, -7), (1400, -15.5),
                     (3000, -31), (6000, -68), (10000, -66.5)]
    rustle_db, = in_time(hand_rustle)
    hum = sum(voltage_ratio(db + 1.0 + 1.1 * drift(13.0)) * np.sin(2 * np.pi * hz * TIME) for hz, db in motor_hum)
    rustle = between(hand_rustle) * voltage_ratio(rustle_db + 6.0 * drift(40)) * noise(RUSTLE)
    street = (voltage_ratio(-42.5) + voltage_ratio(rustle_db - 6.5)) * noise(street_colour)
    return (TIME > CUT_S) * (hum + street) + rustle


def near_air():
    # time [s], level [dB].
    truck_levels = [
        (0, -50.5),
        (2.7, -51),
        (3.4, -38.5),
        (5.1, -40),
        (5.36, -50),
    ]
    # frequency [Hz], level [dB per Hz].
    rumble_colour = [(15, -58), (25, -33.5), (55, 0.5), (75, 3), (97, 0), (198, -10), (221, -17.5),
                     (311, -30), (343, -38.5), (500, -56.5), (650, -79.5), (1100, -120)]
    air_colour = [(180, -28), (300, -2), (532, -7.5), (637, -10.5), (5090, -21.5), (7180, -26.5),
                  (8190, -50), (9300, -31.5), (12000, -38), (15000, -62.5)]
    truck_db, = in_time(truck_levels)
    air_db = -67 + 0.27 * (truck_db - truck_levels[0][1])
    rumble = voltage_ratio(-44.5) * noise(rumble_colour)
    truck = voltage_ratio(truck_db - 2.5) * rms_one(narrow_noise(88.3, 10.3))
    return rumble + truck + voltage_ratio(air_db + 1.5 * drift(1.7) + 1.2 * drift(5.4)) * noise(air_colour)


def far_rasp():
    # start [s], length [s], level [dB].
    rasp_bouts = [
        (1.047, 0.4, -58),
        (1.53, 0.13, -64.5),
        (1.914, 0.29, -64.5),
    ]
    # frequency [Hz], width [Hz], level [dB].
    rasp_bands = [(1180, 85, 5.5), (1320, 120, 2)]
    rasp = rms_one(sum(voltage_ratio(db) * narrow_noise(hz, w) for hz, w, db in rasp_bands))
    sag_db_per_s = 21
    return rasp * sum(bout(s, length, RASP_EDGE_S) * voltage_ratio(db - sag_db_per_s * np.abs(TIME - s))
                      for s, length, db in rasp_bouts)


def insect():
    # start [s], length [s], level [dB].
    chirr_bouts = [
        (2.1, 0.32, -79),
        (4.14, 0.284, -72),
    ]
    chirr = rms_one(narrow_noise(4950, 350))
    return chirr * sum(bout(s, length, RASP_EDGE_S) * voltage_ratio(db) for s, length, db in chirr_bouts)


def ports(x, phase, balance, shared):
    turn = np.exp(.5j * np.interp(HZ, *np.transpose(phase))) * voltage_ratio(at_hz(balance) / 2)
    total, gap = turn + 1 / turn, turn - 1 / turn
    share = np.clip(at_hz(shared), 0, .995)
    tail = rms_one(rng.standard_normal(8000) * voltage_ratio(-60 * TIME[:8000] / 0.2)) / np.sqrt(8000)
    side = share * gap * np.conj(total) / (np.abs(total) ** 2 + 0.23)
    side = side + np.sqrt(1 - share) * rfft(tail, SIZE) * HZ / (HZ + 130)
    return x + irfft(rfft(x, SIZE) * side, SIZE)[:N] * [[1], [-1]]


def scene():
    # frequency [Hz], then
    # left lead [radians], left-right level [dB] or shared share [0-1].
    near_ports = [
        [(0, 0), (5900, -0.2), (8000, -2.7), (10700, -5.8), (15400, -9.6)],
        [(60, .3), (1200, .3), (2500, 1.5), (4400, 4), (7000, .6), (15000, .1)],
        [(60, 1), (130, .99), (260, 0.93), (700, 0.6), (1300, .75), (2400, .97), (4400, 1), (7000, .85), (15000, .9)],
    ]
    far_ports = [
        [(0, 0.0), (300, -.8), (860, -1.9), (2000, -2.4), (4400, -5.6), (8400, -7.8), (15400, -16)],
        [(60, 0.36), (200, -0.2), (380, -2.5), (700, -5.0), (1290, -3.5), (2380, 0.2), (4400, 3.95), (8120, 0.8), (15000, -0.5)],
        [(60, 0.85), (500, 1), (1000, 0.8), (2200, 0.73), (4500, 0.65), (10000, 0.7)],
    ]
    far = engine() + chuffs() + spray() + starter_clacks() + pulley_squeak() + driveway()
    near = wrench() + tool_knocks() + jaw_squeals() + frame_tube() + handling()
    near += near_air() + far_rasp() + insect()
    near *= np.clip((CUT_S - TIME) / 0.0034, 0, 1)
    return ports(near, *near_ports) + ports(far, *far_ports) + scatter()


def top_cut(x):
    return signal.sosfilt(signal.butter(12, 15890, fs=SR, output="sos"), x)


def record(dry):
    peak_top = .9
    x = signal.sosfilt(signal.butter(3, 36, "high", fs=SR, output="sos"), dry)
    x = peak_top * np.tanh(x / peak_top)
    x = signal.sosfilt(signal.ellip(10, .5, 60, 15880, fs=SR, output="sos"), x)
    return top_cut(x)


dry = scene()
out = record(dry)
generate_wav(out)
```